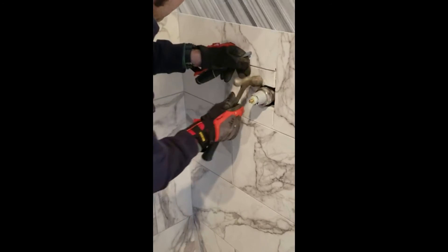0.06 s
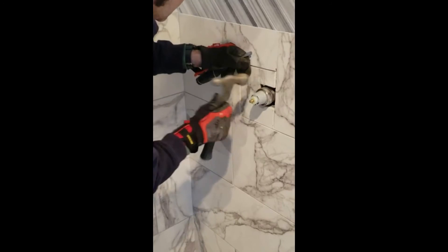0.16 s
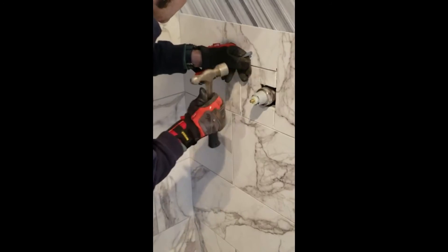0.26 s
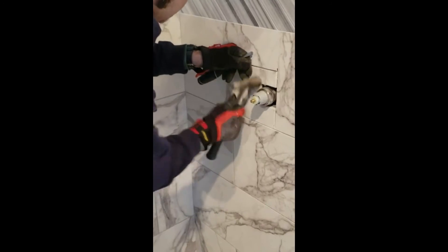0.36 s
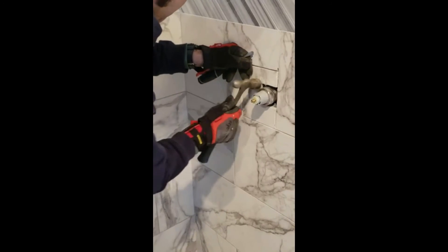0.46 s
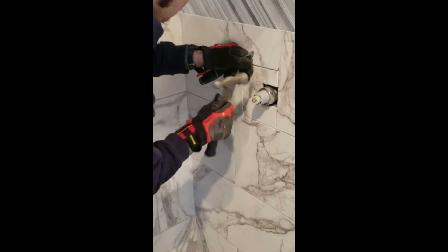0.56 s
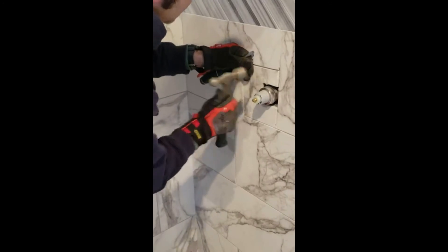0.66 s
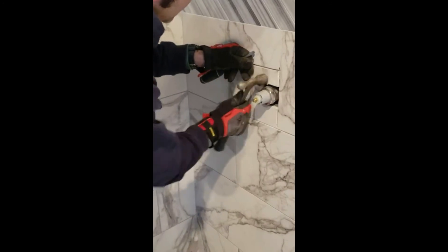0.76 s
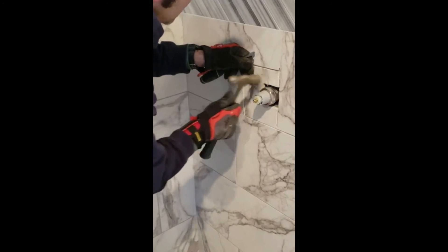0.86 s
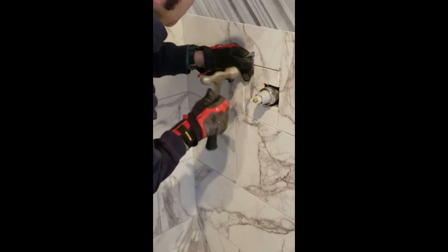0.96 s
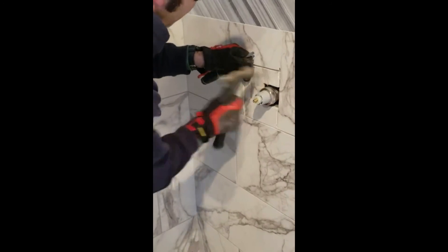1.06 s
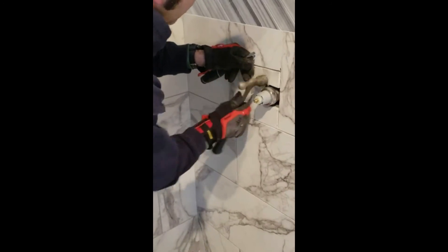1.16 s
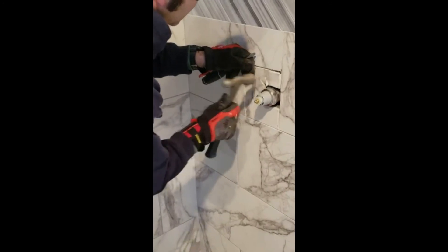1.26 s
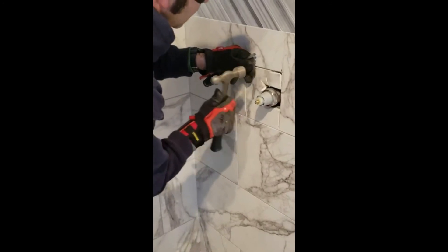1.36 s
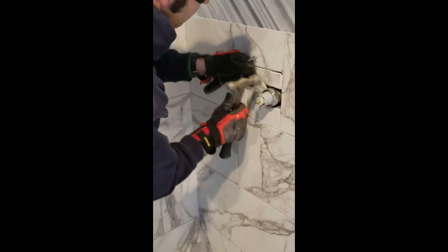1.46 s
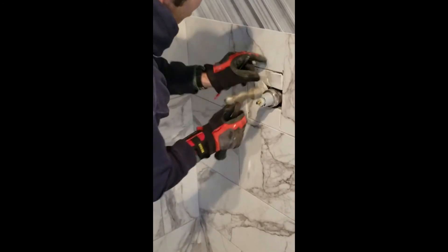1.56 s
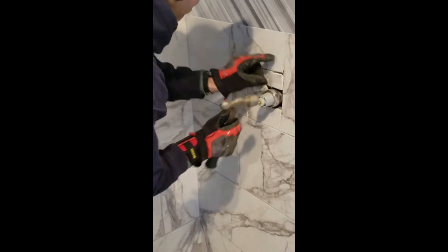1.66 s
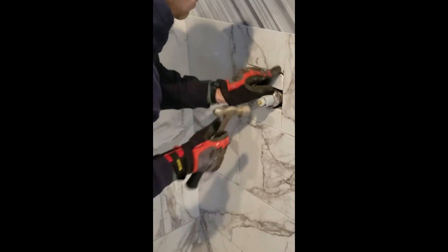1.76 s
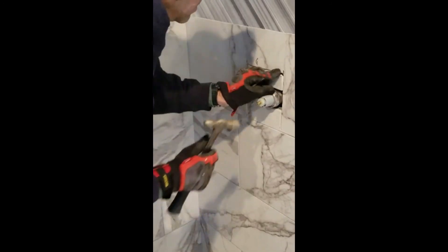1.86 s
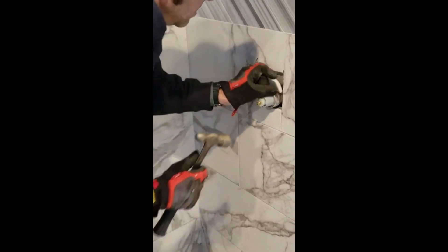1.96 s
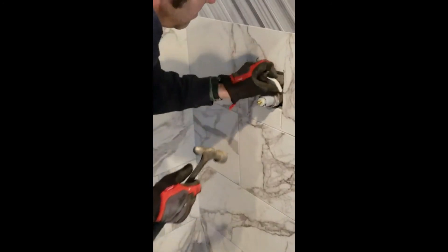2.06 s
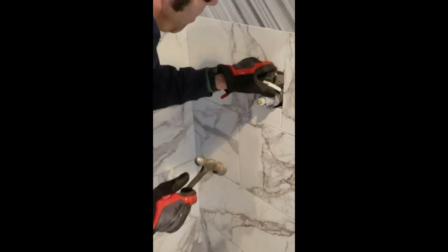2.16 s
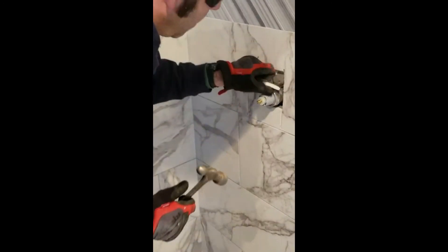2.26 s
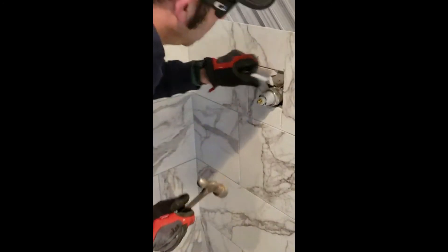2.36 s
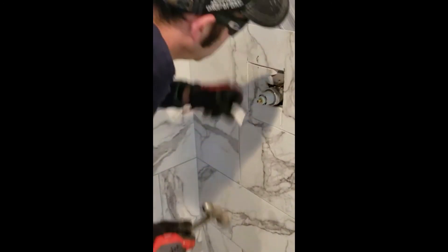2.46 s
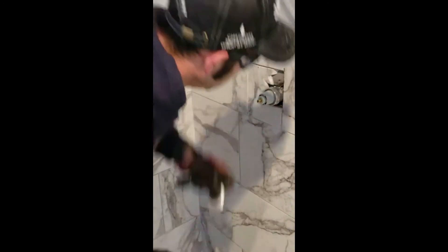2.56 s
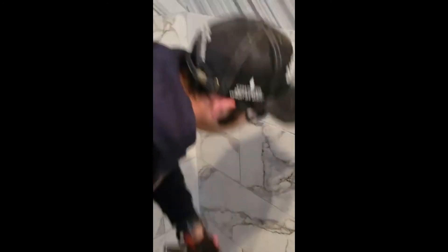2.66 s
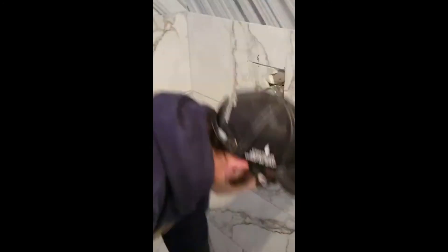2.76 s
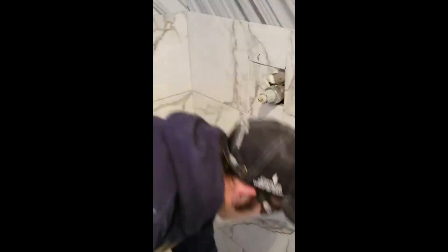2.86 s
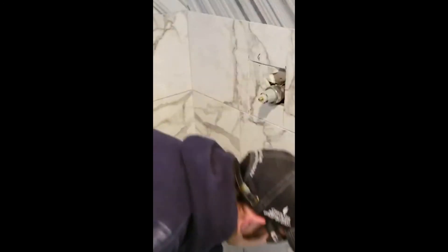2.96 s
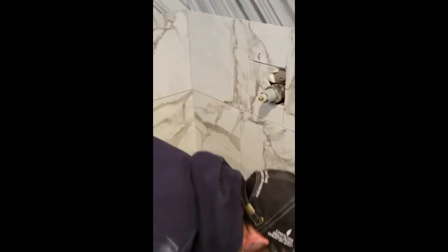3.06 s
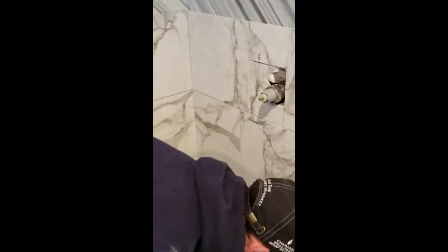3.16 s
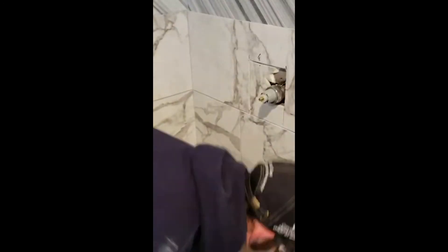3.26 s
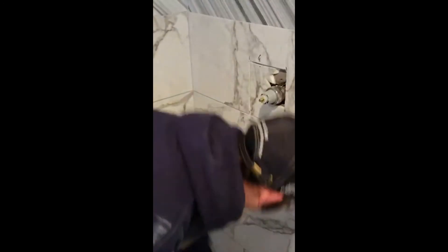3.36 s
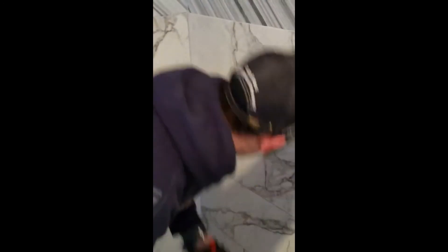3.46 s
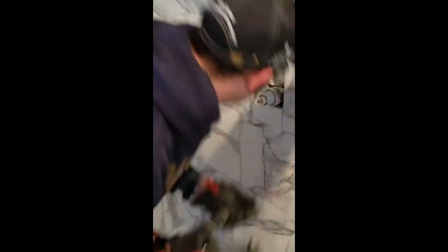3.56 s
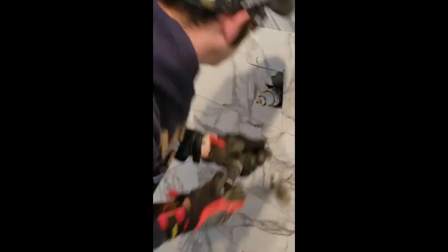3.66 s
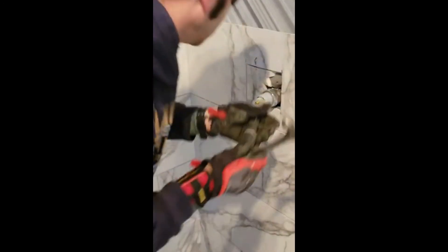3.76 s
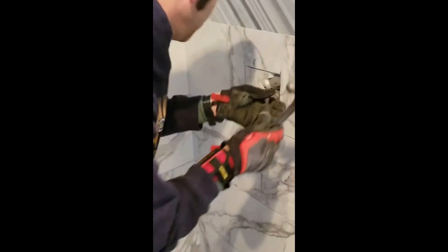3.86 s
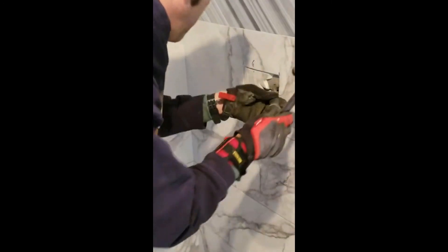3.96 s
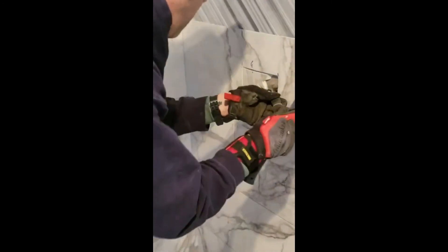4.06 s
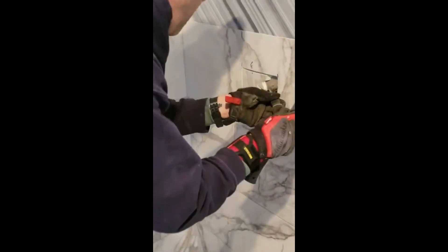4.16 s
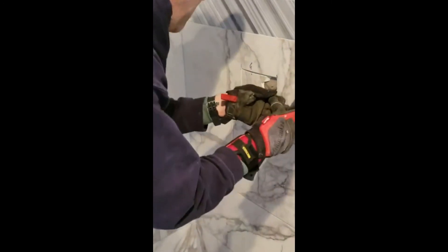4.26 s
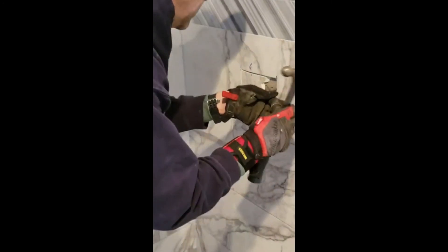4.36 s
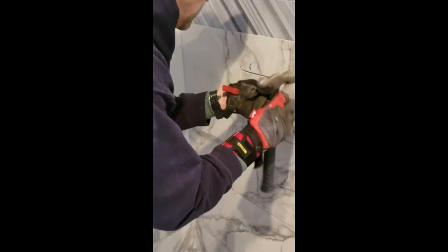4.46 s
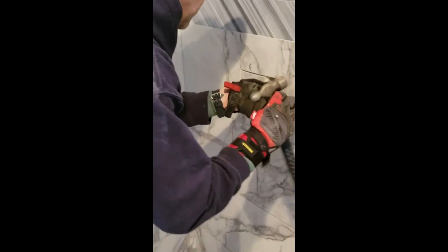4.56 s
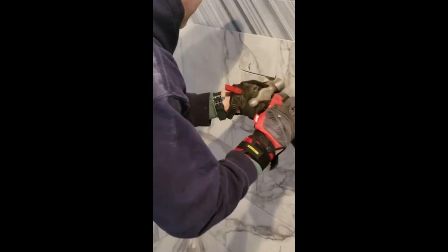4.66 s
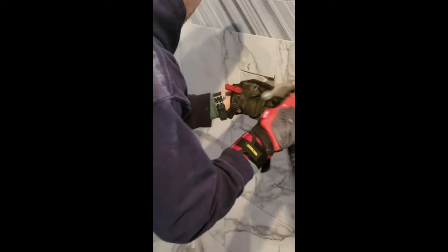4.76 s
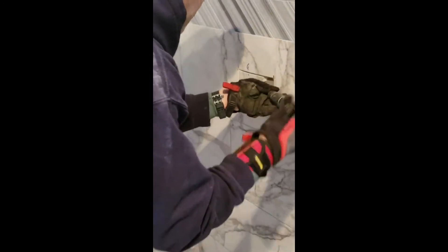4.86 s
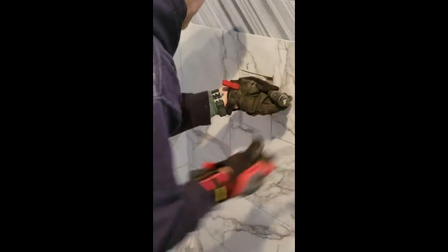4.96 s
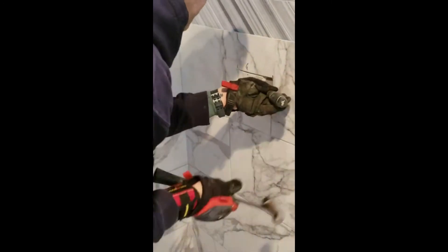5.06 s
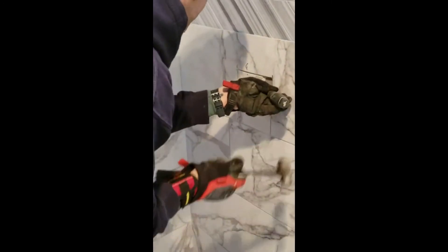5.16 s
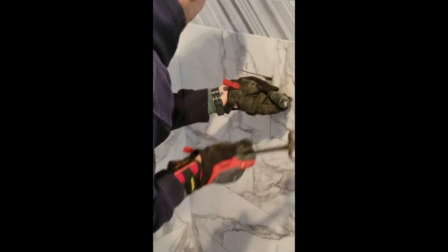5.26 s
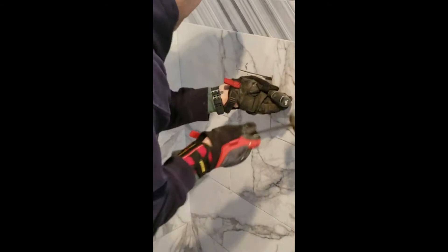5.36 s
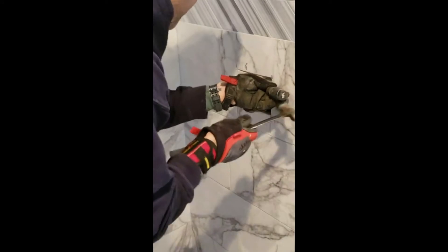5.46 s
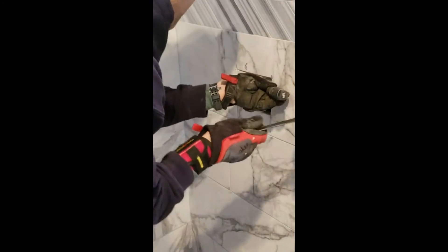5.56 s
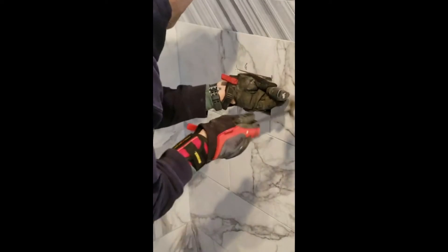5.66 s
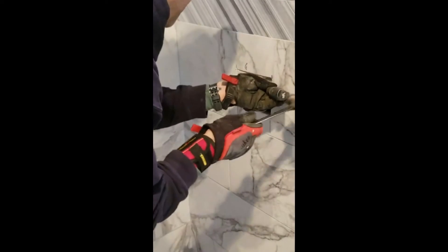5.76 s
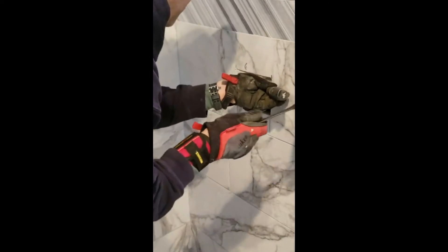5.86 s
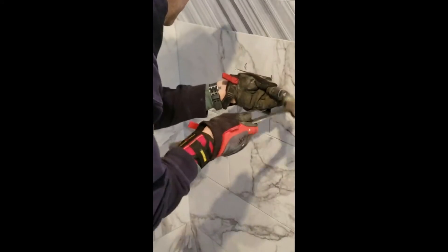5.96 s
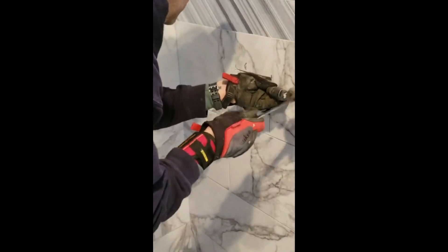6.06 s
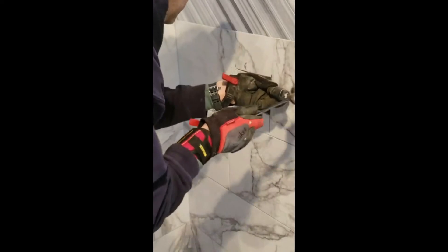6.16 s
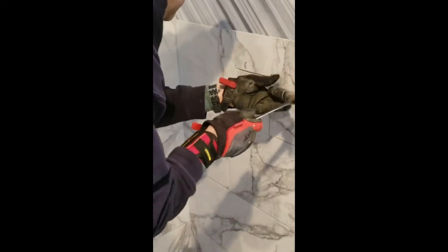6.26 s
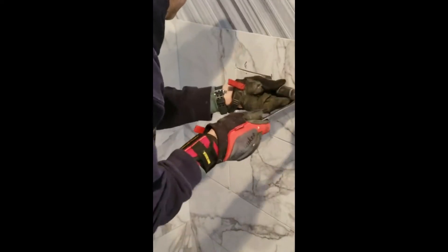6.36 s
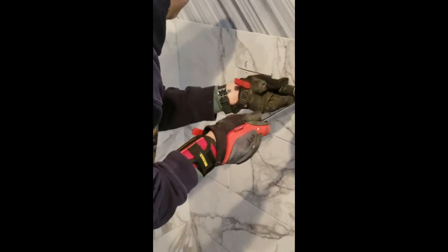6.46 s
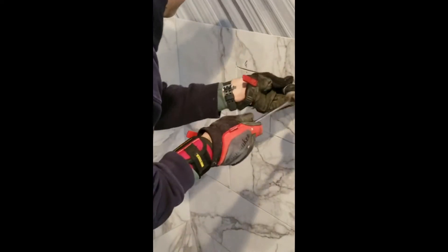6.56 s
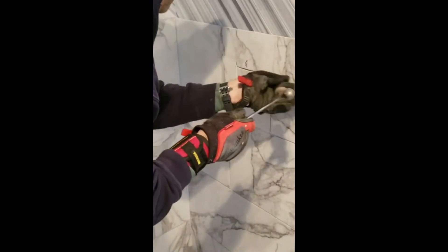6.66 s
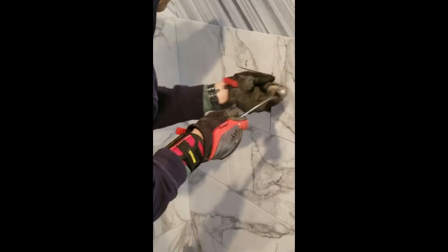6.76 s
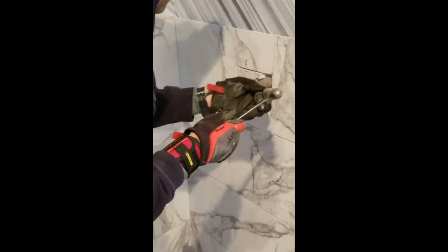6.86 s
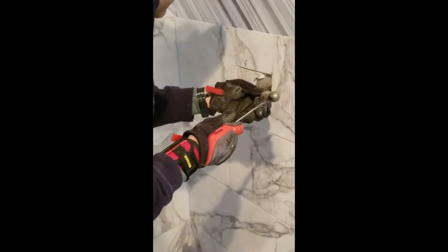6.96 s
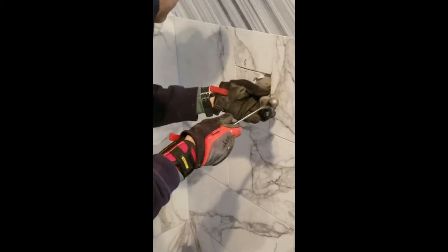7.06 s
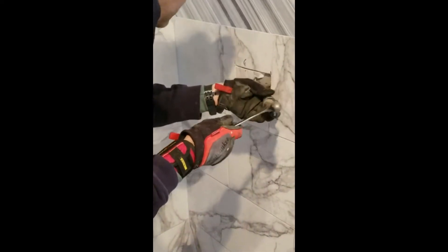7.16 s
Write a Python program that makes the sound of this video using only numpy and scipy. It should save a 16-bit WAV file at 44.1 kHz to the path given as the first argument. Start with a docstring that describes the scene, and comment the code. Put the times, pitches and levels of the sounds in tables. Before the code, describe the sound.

Hammer on chisel chips wall tile in an echoing bare bathroom: booming strikes, gritty handling and light taps, a bouncing shard, then more blows.

```python
"""A hammer drives a chisel into wall tile in a small bare bathroom: filtered clicks, booming wall modes.
After the first run of blows the chisel scrapes and is set at a second spot amid light knocks; gloves and
sleeves rustle (grainy noise), grit ticks, a shard drops and bounces (clacks with one high note).
A second run of blows follows, ending in rustle and sharp ticks. Faint air noise runs throughout;
the hard walls echo, and two spaced microphones with gain control pick it all up."""
import sys
import numpy as np
from scipy import signal
from scipy.fft import rfft, irfft
from scipy.io import wavfile
from scipy.ndimage import uniform_filter1d

SR = 44100
rng = np.random.default_rng(int(sys.argv[2]) if len(sys.argv) > 2 else 0)


def how_loud(loudness_db):
    """Turn decibels into a plain amplitude multiplier (0 dB gives 1, 20 dB gives 10)."""
    steps = np.asarray(loudness_db, float) / 20
    return 10 ** steps


def store_pcm(level_fs):
    """Save levels as 16-bit WAV."""
    pcm = np.round(np.clip(level_fs, -1, 1) * 32767).astype(np.int16)
    wavfile.write(sys.argv[1], SR, np.atleast_2d(pcm).T)


N = 317520
LEAD = SR // 2  # samples of scene before time zero
MOVED_S = 1.8  # the chisel leaves the first spot

# blows and lighter knocks: (time [s], peak [dB], wall boom [dB],
# then relative to the knock: hollow [dB], crack [dB], fizz [dB])
BLOWS = [(-0.27, 2, -26.5, -15, -5, -30), (0.115, -2.5, -23.5, -12.5, -9, -24),
         (0.486, -3.5, -22, -11.5, -9, -24.5), (0.841, -5, -22.5, -6, -7.5, -17.5),
         (1.215, -6.5, -22, -8.5, -11.5, -20), (2.910, -27.5, -50, -13, -6, -14),
         (3.838, -61.5, -68, -17, -8.5, -13), (4.105, -32.5, -35, 1.5, -11, -27),
         (4.394, -36.5, -46, 2.5, -23, -17), (4.670, -26, -43.5, -19, -9.5, -31.5),
         (4.768, -29.5, -55, -12, -6, -30), (5.057, -38.5, -60, -16, -3, -4.5),
         (5.277, -50.5, -56, -3, -13, -27), (5.46, -53, -65, 16, -20, -21),
         (5.483, -20, -32, -13.5, -16.5, -22), (5.783, -6, -10.5, -20, -15.5, -28),
         (6.042, -7, -12, -8, -9.5, -18), (6.295, -11.5, -12, -2, -10.5, -19),
         (6.63, -14.5, -27.5, -28, -11, -18), (6.869, -36, -48.5, -3, -7.5, -25.5),
         (7.121, -19, -55, -32.5, -9.5, -4)]
# brief tile modes: (frequency [Hz], level [dB], t60 [s])
TILE_MODES = [(455, -1.5, 0.013), (1000, -5.5, 0.0068), (1326, -2, 0.011), (1860, 3.5, 0.0033),
              (2455, -23, 0.0047), (3180, -12.5, 0.007), (6400, -18, 0.019)]
# dry tonal knock of the tile, mostly direct, at the second spot: (frequency [Hz], level [dB], t60 [s])
DRY_KNOCK_MODES = [(1378, -4.5, .03), (1736, -8, .02)]
# crumbling glaze and grout, spectrum: (frequency [Hz], level [dB])
CRUMB_SPECTRUM = [(700, -35.5), (2500, 4), (4500, -9.5), (6500, -10.5), (10000, -10)]
# booming modes of wall and room: (frequency [Hz], t60 [s], level at first spot [dB], at second spot [dB])
WALL_MODES = [(46, 0.98, -11.5, -17), (72, 0.64, -16.5, -16), (101.8, 0.34, -10.5, -8),
              (102.5, 0.17, -14.5, -8.5), (119.1, 0.3, 1.5, -14), (128.8, 0.39, -15.5, -4),
              (152.65, 0.69, 0.5, -13), (152, 0.23, -3, -28), (172.8, 0.49, 5, -3.5),
              (183.6, 0.36, -3.5, 4), (189, 0.15, -6.5, -4.5), (216.7, 0.36, -14.5, -7.5),
              (231, 0.9, -10, -7), (252.4, 1, -7.5, -9), (263.7, 0.65, -10, -4), (302, 0.87, -13, -26),
              (325.5, 0.79, -6, -10), (334, .4, -1, 3), (384.3, 0.36, -10, -55), (397, 0.34, -8, -13),
              (423, .35, 1, -65), (440, 1, -8.5, -7), (517, 0.22, -3.5, -7), (511.6, 0.5, -1, -25)]
# ticks of grit and chips, some with a close echo: (time [s], peak [dB], pitch [Hz])
TICKS = [(1.833, -47, 14700), (1.9708, -18, 14800), (1.9741, -22.5, 12600), (2.1383, -30, 13700),
         (2.2663, -34.5, 14700), (2.3798, -48, 12300), (2.4351, -42.5, 14350), (2.831, -36, 6500),
         (3.1657, -41, 6470), (3.1813, -40, 7050), (4.246, -21.5, 13000), (4.5875, -27.5, 6460),
         (5.2759, -35, 13000), (5.4324, -34.5, 2290), (6.451, -24.5, 5700), (6.8727, -28, 2010),
         (7.117, -20.5, 11800), (7.1399, -5.5, 6960), (7.1423, -2, 7100), (7.147, -18, 6460)]
# bounces of the dropped shard: (time [s], clack peak [dB], thud level [dB])
BOUNCES = [(3.2634, -2, -32), (3.2755, -2, -16), (3.2802, -6, -36), (3.2886, -27.5, -35.5),
           (3.301, -20, -36), (3.3971, -12, -46), (3.4022, -4, -37.5), (3.4077, -10.5, -50),
           (3.4885, -30, -48)]
# clack spectrum of the shard: (frequency [Hz], level [dB])
CLACK_SPECTRUM = [(150, -32.5), (800, -11.5), (2000, -11.5), (3300, -9.5), (4300, 1), (5400, -6.5),
                  (6600, -2.5), (7600, -10.5), (9000, -15), (13000, -27.5), (16000, -15.5)]
# high note of the shard: (frequency [Hz], t60 [s])
SHARD_NOTE = (15000, .2)
# bin under the shard: (frequency [Hz], t60 [s])
BIN_THUD = (500, 0.0072)
# hand movements: (time of top [s], rise per 20 dB [s], fall per 20 dB [s], scrape [dB], rustle [dB])
MOVES = [(1.669, 0.096, 0.051, -58, -71), (1.935, 0.032, 0.076, -58, -74), (2.055, 0.073, 0.26, -47, -56.5),
         (2.14, .1, .2, -56, -68), (2.401, 0.21, 0.23, -57, -63), (2.95, 0.19, 0.335, -58.5, -51.5),
         (3.2, 0.29, .3, -75, -66), (3.62, 0.53, .5, -73.5, -57.5), (4.138, 0.037, 0.16, -38.5, -58.5),
         (4.276, 0.22, 0.49, -61, -58.5), (4.53, 0.087, 1, -54.5, -52), (4.86, 0.6, 0.25, -47.5, -57),
         (4.945, 0.21, 0.18, -60, -41.5), (5.07, .04, 0.17, -58, -50.5), (5.45, 0.58, 0.16, -59.5, -60),
         (6.42, 0.21, 0.19, -40, -51.5), (6.46, 0.017, 0.31, -50, -37), (6.609, 0.059, 0.15, -40.5, -31),
         (6.88, .2, 0.22, -48, -60), (7.148, .01, 0.43, -40, -43.5)]
# floor under the movements: (scrape [dB], rustle [dB])
STIR_DB = (-90, -79)
# steel on grout, spectral density: (frequency [Hz], relative level [dB])
SCRAPE_SPECTRUM = [(150, 0), (400, -3.5), (900, -4.5), (1400, 2), (2000, -6.5), (3500, -17.5), (8000, -42)]
# cloth and falling dust, spectral density: (frequency [Hz], relative level [dB])
RUSTLE_SPECTRUM = [(590, -43.5), (1000, -4.5), (1110, -23), (1350, -14.5), (2560, -9), (3300, -2.5),
                   (9720, -4.5), (13400, -7), (16000, -9)]
# background air, spectral density: (frequency [Hz], relative level [dB])
AIR_SPECTRUM = [(12, -32), (20, 3), (44, -1.5), (60, -20.5), (127, -10), (187, -33.5), (410, -45.5),
                (642, -40.5), (2600, -48.5), (7310, -31.5), (7950, -38.5), (10800, -39), (16000, -32.5)]
# reverberation: (frequency [Hz], t60 [s])
ROOM_T60 = [(100, 0.97), (260, 0.63), (700, 0.74), (1840, 0.56), (4850, 0.5), (8000, 0.42), (12800, 0.29)]
# left-right likeness of a diffuse field: (frequency [Hz], correlation [-1..1])
LIKENESS = [(30, 0.79), (100, 0.84), (200, 0.9), (550, 0.69), (900, -0.18), (1650, -0.068), (5000, -0.044)]
# microphone response: (frequency [Hz], gain [dB])
MIC_RESPONSE = [(20, -4.5), (100, 2), (3000, 2.5), (7000, 4), (8500, -2.5), (12000, 5), (15700, 3),
                (16100, -25)]


def read(points, hz):
    """Interpolates a table on a log-frequency axis."""
    f, value = np.transpose(points)
    return np.interp(np.log(hz + 1), np.log(f + 1), value)


def evened(x):
    """Scales to rms 1."""
    return x / np.sqrt(np.mean(x ** 2) + 1e-20)


def peaked(x):
    """Scales to peak 1."""
    return x / np.max(abs(x))


def colour(x, points):
    """Filters by a (frequency [Hz], gain [dB]) table, zero phase."""
    size = x.shape[-1]
    gain = how_loud(read(points, np.fft.rfftfreq(size, 1 / SR)))
    return irfft(rfft(x) * gain, size)


def pulse(points, size=2048):
    """Minimum-phase click: the given spectrum, nothing before its start."""
    log_gain = np.log(how_loud(read(points, abs(np.fft.fftfreq(size, 1 / SR)))))
    spectrum = np.exp(np.conj(signal.hilbert(log_gain)))
    return np.fft.ifft(spectrum).real[:size // 2]


def ring(modes, t, spread=0.065):
    """Dying sines, retuned at random by the relative spread at every strike."""
    hz, db, t60 = np.transpose(modes)[:, :, None]
    shift = 1 + spread * rng.standard_normal((len(modes), 1))
    return (how_loud(db - 60 * t / t60) * np.sin(2 * np.pi * hz * shift * t)).sum(0)


def burst(t, t60_s):
    """Exponentially dying noise."""
    return rng.standard_normal(len(t)) * how_loud(-60 * t / t60_s)


def pair(size):
    """Two noises, alike in the bass as close microphones hear a diffuse field."""
    a, b = rfft(rng.standard_normal((2, size)))
    same = np.clip(read(LIKENESS, np.fft.rfftfreq(size, 1 / SR)), -1, 1)
    return irfft([a, same * a + np.sqrt(1 - same ** 2) * b], size)


def add(mix, time_s, sound):
    """Mixes a sound in at its time, cut at the end of the mix."""
    part = mix[..., LEAD + round(time_s * SR):][..., :sound.shape[-1]]
    part += sound[..., :part.shape[-1]]


def blows(roomy, close, boom):
    """Steel on steel cracks, grout crumbles, the tile rings briefly, and the wall booms."""
    hollow_from_hz = 230  # modes from here up follow the hollowness of the blow
    mode_spread_db = 2.5  # from blow to blow
    crunch_db, crunch_per_s, crunch_t60_s = -11.5, 550, 0.12
    t, after = np.arange(2048) / SR, np.arange(SR // 8) / SR
    crumb = peaked(pulse(CRUMB_SPECTRUM))
    wall = booms()
    mode_hz, _, *spot_db = np.transpose(WALL_MODES)
    for time_s, db, boom_db, hollow_db, crack_db, fizz_db in BLOWS:
        moved = time_s > MOVED_S
        body = how_loud(-22.5) * ring(TILE_MODES, t)
        body[0] += 1  # the blow itself
        spectrum = [(40, -31), (150, -10.5), (420, -8), (750, -5), (1100, -4.5), (1500, -4.5),
                    (2500, crack_db + 9), (4500, crack_db), (7000, crack_db - 6.0), (12000, fizz_db)]
        knock = peaked(signal.fftconvolve(body, pulse(spectrum)))
        add(roomy, time_s, how_loud(db) * knock)
        add(close, time_s, moved * how_loud(db) * ring(DRY_KNOCK_MODES, t, spread=0.034))

        falls = rng.random(len(after)) < crunch_per_s / SR
        crumbs = signal.fftconvolve(burst(after, crunch_t60_s) * falls, crumb)
        add(roomy, time_s, how_loud(db + crack_db + crunch_db) * crumbs)

        drive_db = np.where(mode_hz < hollow_from_hz, boom_db, db + hollow_db - 10)
        vary_db = mode_spread_db * rng.standard_normal(len(mode_hz))
        add(boom, time_s, how_loud(drive_db + spot_db[int(moved)] + vary_db) @ wall)


def booms():
    """Low modes: neighbours start opposed, so the boom swells; the higher, the more the microphones differ."""
    t = np.arange(SR) / SR
    hz, t60 = np.transpose(WALL_MODES)[:2, :, None]
    apart_rad = rng.choice([-1, 1], hz.shape) * hz / 900
    decay = how_loud(-60 * t / t60)
    waves = np.array([decay * np.sin(2 * np.pi * hz * t + side * apart_rad) for side in (1, -1)])
    polarity = (-1.) ** np.arange(len(WALL_MODES))[:, None]
    return waves * (1 - np.exp(-t / 0.024)) * polarity


def ticks(grit):
    """Each tick is a click with a pitch, smeared by a short spit of noise."""
    t = np.arange(1024) / SR
    for time_s, db, hz in TICKS:
        click = pulse([(hz / 16, -50), (hz / 4, -24), (hz / 2, -12), (hz, 0), (hz * 2, -10), (hz * 4, -15)])
        tick = peaked(signal.fftconvolve(click, burst(t, t60_s=0.0073)))
        add(grit, time_s, how_loud(db) * tick)


def shard(roomy, close):
    """A stiff little piece clacks, keeps one very high note ringing, and thuds the bin it lands on."""
    note_db = -22  # relative to the clack
    note_hz, note_t60_s = SHARD_NOTE
    thud_hz, thud_t60_s = BIN_THUD
    t, click = np.arange(SR // 3) / SR, pulse(CLACK_SPECTRUM)
    for time_s, db, thud_db in BOUNCES:
        clack = peaked(signal.fftconvolve(click, burst(t[:256], t60_s=0.0007)))
        note = ring([(note_hz, note_db, note_t60_s)], t, spread=0.0005)
        add(close, time_s, how_loud(db) * clack)
        add(close, time_s, how_loud(db) * note)
        thud = ring([(thud_hz, thud_db, thud_t60_s)], t, spread=0.16)
        add(roomy, time_s, thud * np.minimum(t / 0.0014, 1))  # soft onset


def hands():
    """Grainy scraping of steel on grout and the wider rustle of cloth and falling dust."""
    t, out = np.arange(N) / SR, np.zeros((2, N))
    top, rise, fall, *peak_db = np.transpose(MOVES)[:, :, None]
    swells = how_loud(-20 * np.maximum((top - t) / rise, (t - top) / fall))
    spectra, grain_depths_db = (SCRAPE_SPECTRUM, RUSTLE_SPECTRUM), (3.0, 2.4)  # depth: rms
    for db, stir_db, spectrum, grain_db in zip(peak_db, STIR_DB, spectra, grain_depths_db):
        level = how_loud(stir_db) + (how_loud(db) * swells).max(0)
        grains = how_loud(grain_db * evened(uniform_filter1d(rng.standard_normal(N), 120)))
        out += uniform_filter1d(level, 300) * evened(colour(pair(N) * grains, spectrum))
    return out


def room(x):
    """Dense echoes: strong early ones, then a tail dying band by band; one pattern per chisel spot."""
    t, hz = np.arange(SR) / SR, np.fft.rfftfreq(SR, 1 / SR)
    first_spot = np.arange(len(x)) < LEAD + MOVED_S * SR
    out = np.zeros((2, len(x)))
    centres_hz = np.array(ROOM_T60)[:, 0]
    bands = [read(np.c_[centres_hz, one], hz) for one in np.eye(len(ROOM_T60))]
    onset = np.clip((t - 0.0008) / 0.00017, 0, 1)
    early = 1 + how_loud(5.5) * how_loud(-60 * t / 0.026)  # near tiles
    for spot in (first_spot, ~first_spot):
        noise = rfft(pair(SR))
        tail = sum(irfft(noise * band, SR) * how_loud(-60 * t / t60) for band, (_, t60) in zip(bands, ROOM_T60))
        tail *= onset * early / np.linalg.norm(tail[0])
        out += signal.fftconvolve((x * spot)[None], tail, axes=1)[:, :len(x)]
    return out


def air():
    """Steady coloured noise, nearly independent between the microphones in the treble."""
    return how_loud(-64) * evened(colour(pair(N), AIR_SPECTRUM))


def scene():
    """Direct sound reaches the left microphone first; ticks and clacks excite less echo than blows."""
    right_lag_samples, right_db = 13, -2.5
    roomy, close, grit = np.zeros((3, N + LEAD))
    boom = np.zeros((2, N + LEAD))
    blows(roomy, close, boom)
    ticks(grit)
    shard(roomy, close)
    source = roomy + close + grit
    direct = np.array([source, how_loud(right_db) * np.roll(source, right_lag_samples)])
    echoes = room(how_loud(12) * roomy + how_loud(-2.5) * close + how_loud(-1) * grit)
    struck = direct + echoes + boom
    return struck[:, LEAD:] + hands() + air()


def low_pass(x):
    """Removes everything above the highest recorded frequency."""
    return signal.sosfilt(signal.butter(12, 16820, fs=SR, output="sos"), x)


def record(dry):
    """Microphone colour, gain control that ducks at once and recovers slowly, soft ceiling."""
    threshold_db, held_fall_db_per_s = -11.0, 14.0
    gain_db, duck_db_per_db = -1, 0.11
    x = colour(dry, MIC_RESPONSE)
    power_db = 10 * np.log10(abs(uniform_filter1d((x ** 2).mean(0), 300)) + 1e-12)
    fall_db = np.arange(N) * held_fall_db_per_s / SR
    held_db = np.maximum.accumulate(power_db + fall_db) - fall_db
    over_db = np.maximum(held_db - threshold_db, 0)
    mix = np.tanh(x * how_loud(gain_db - duck_db_per_db * uniform_filter1d(over_db, 150)))
    return low_pass(mix)


dry = scene()
out = record(dry)
store_pcm(out)
```